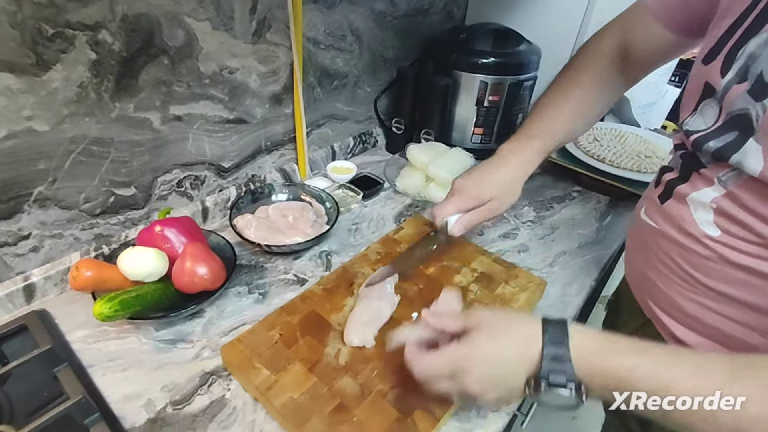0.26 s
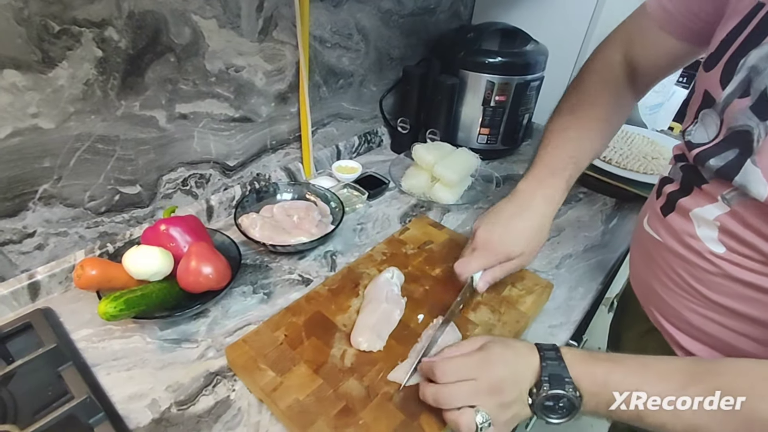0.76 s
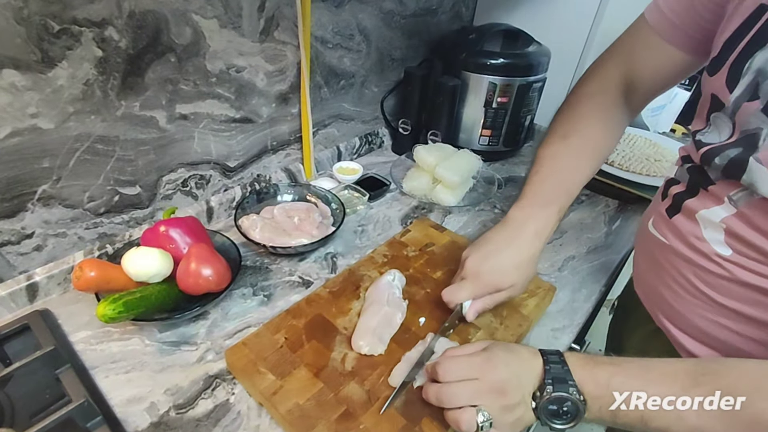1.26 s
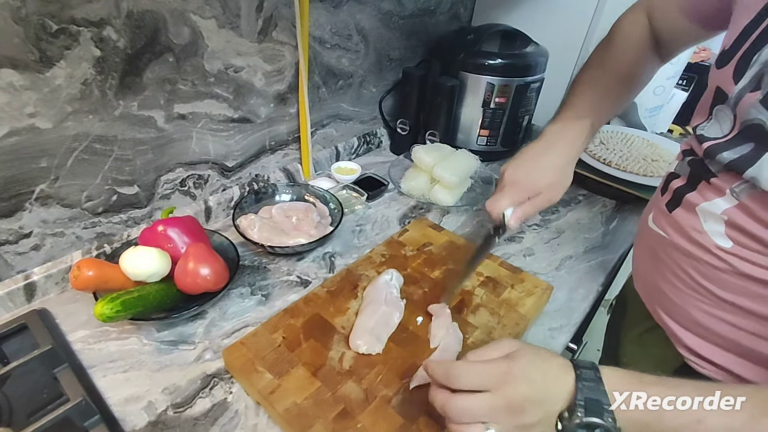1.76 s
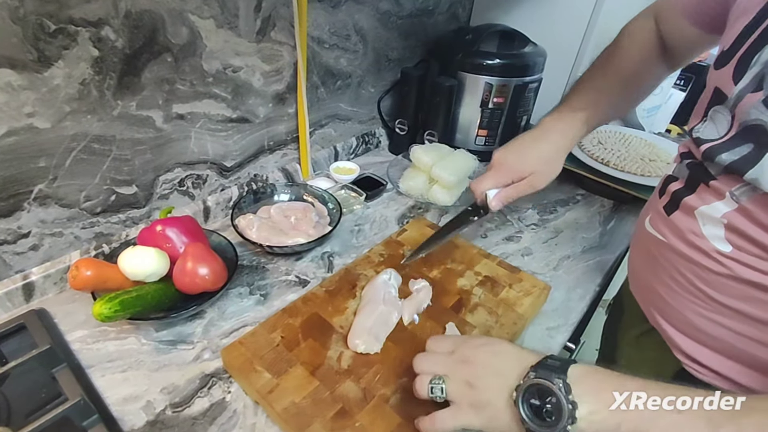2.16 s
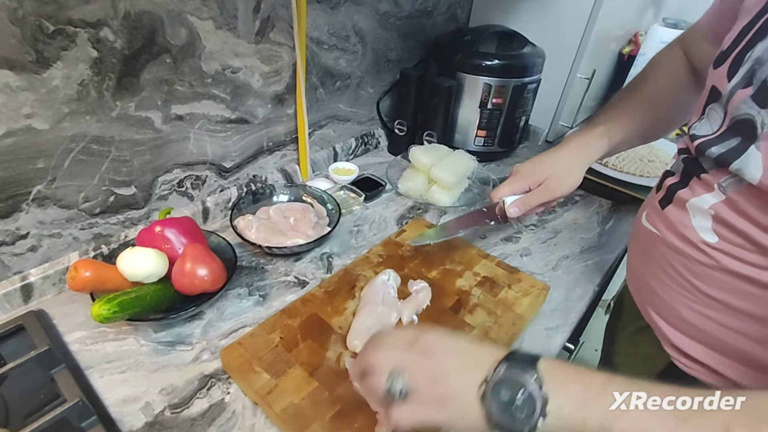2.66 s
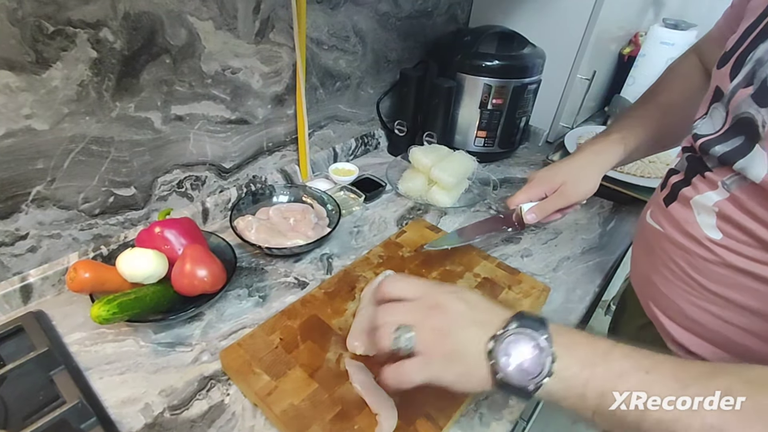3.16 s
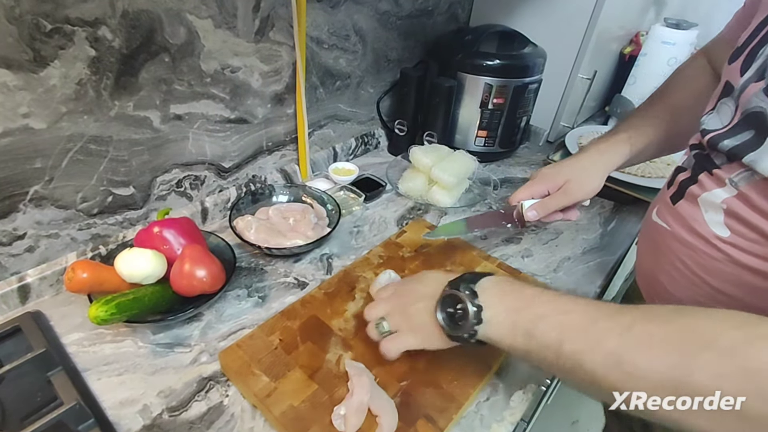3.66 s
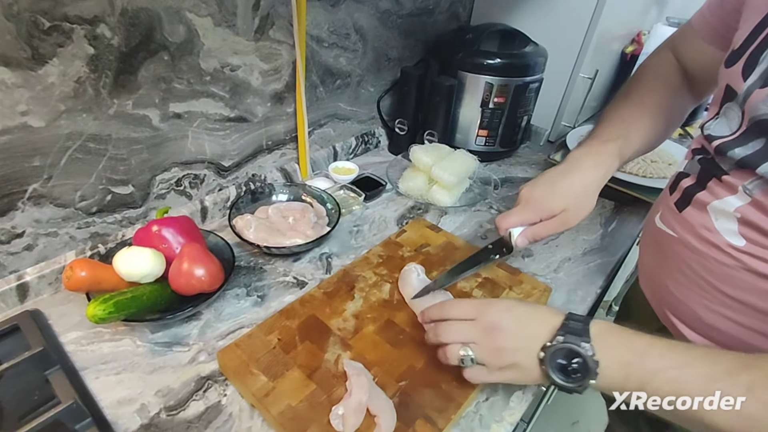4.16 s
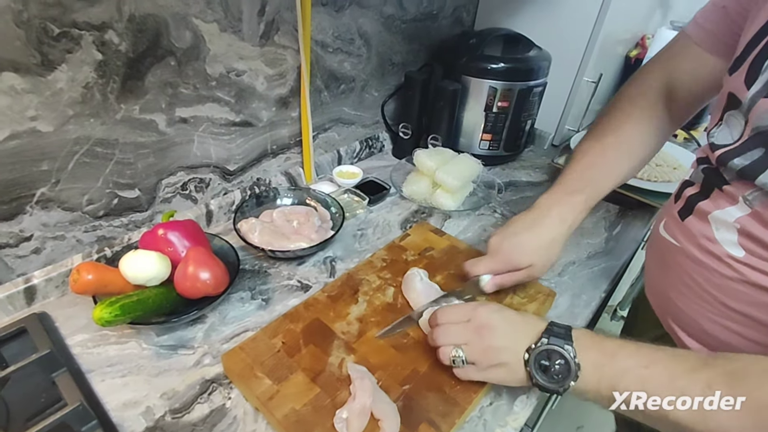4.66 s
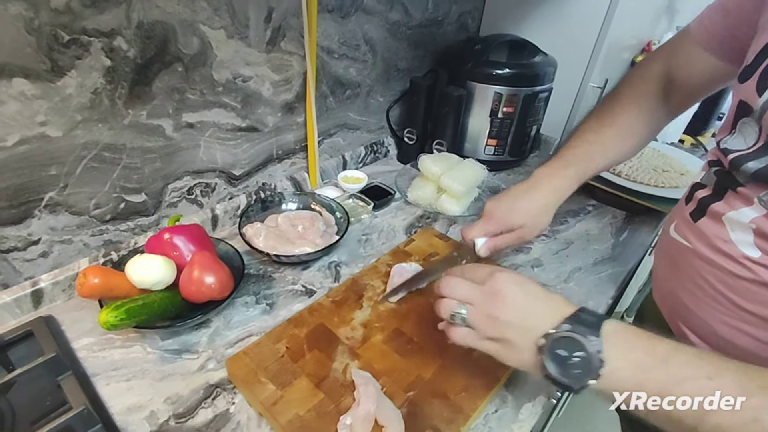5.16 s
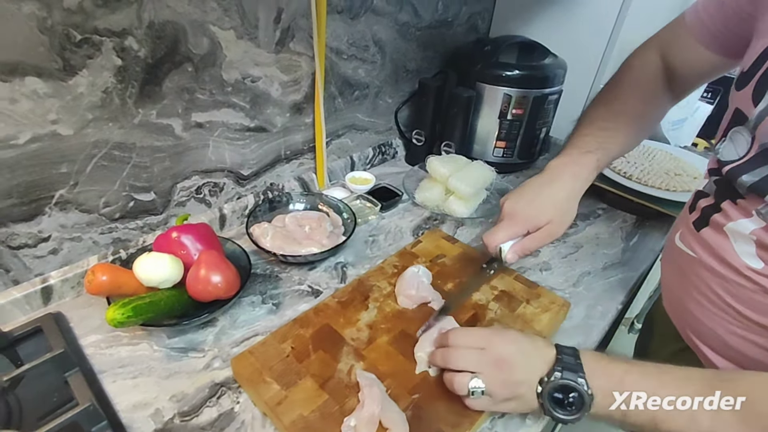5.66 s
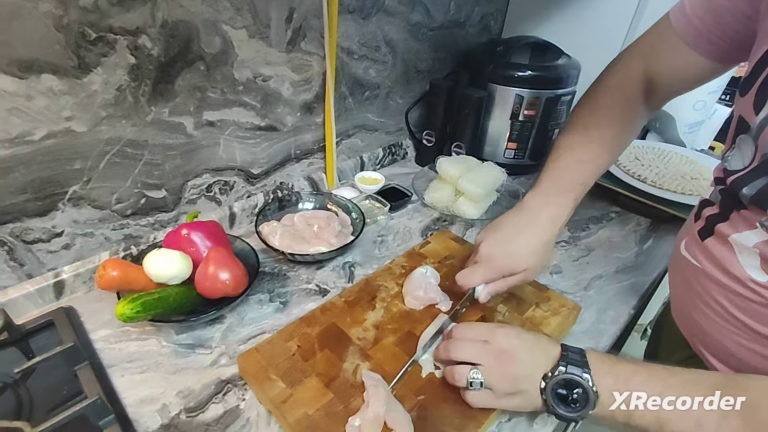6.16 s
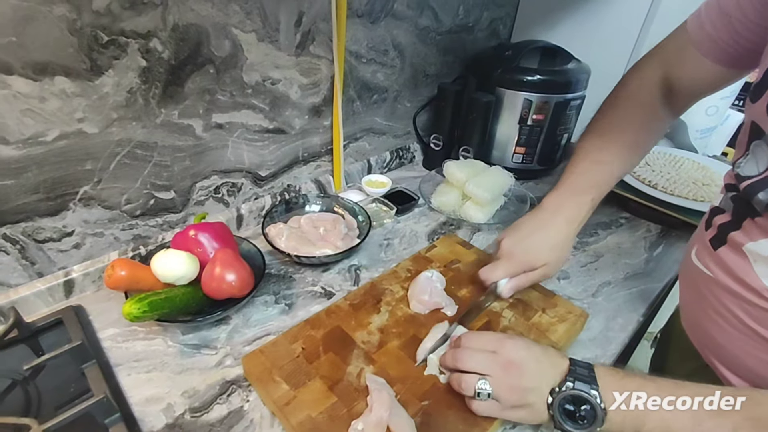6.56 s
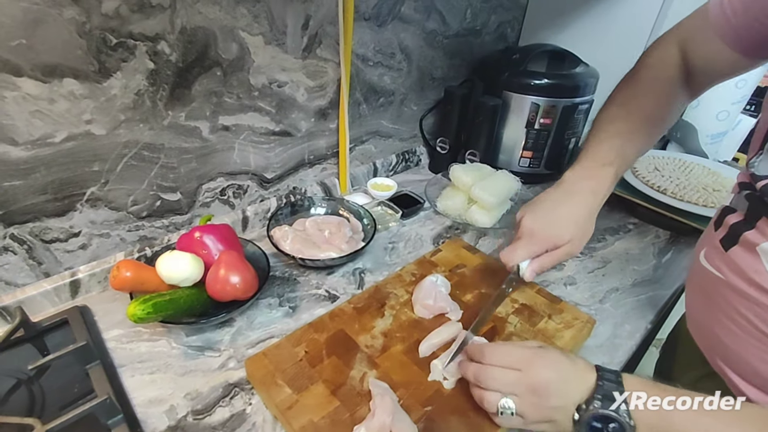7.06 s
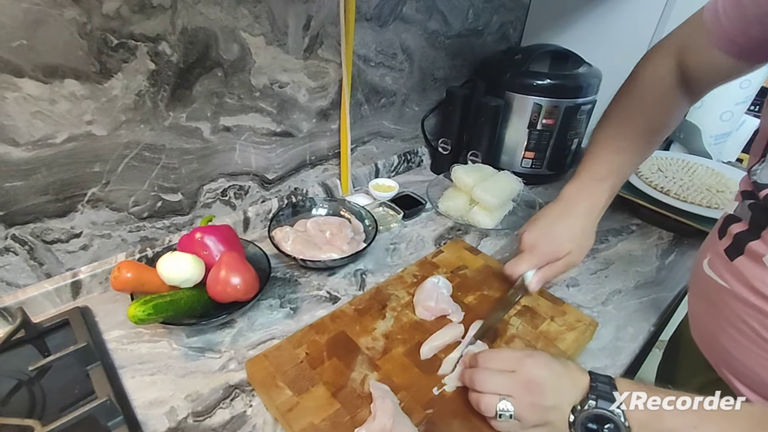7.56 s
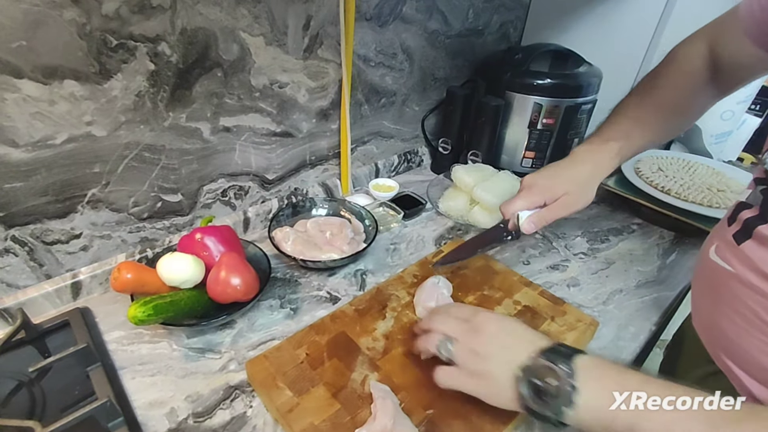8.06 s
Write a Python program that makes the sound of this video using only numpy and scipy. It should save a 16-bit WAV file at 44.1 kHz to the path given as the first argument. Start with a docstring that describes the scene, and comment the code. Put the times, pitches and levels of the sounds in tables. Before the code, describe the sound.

Wet meat squelches and slaps on a cutting board as a knife taps and saws through it in a small kitchen.

```python
"""A small, hard-walled kitchen: a knife slices raw chicken on a wooden board.
The edge taps down, then sticks and slips to and fro on the wood. Wet meat squelches under the
fingers, slices slap down, and the board bumps the counter. An appliance hums under a steady hiss.
Two microphone ports colour the treble differently."""
import sys
import numpy as np
from scipy import signal
from scipy.fft import rfft, irfft
from scipy.io import wavfile

SR = 44100
rng = np.random.default_rng(int(sys.argv[2]) if len(sys.argv) > 2 else 0)


def to_wav(s):
    """Save 16-bit WAV."""
    ch = np.atleast_2d(s).T  # columns
    pcm = np.round(np.clip(ch, -1, 1) * 32767)  # PCM
    wavfile.write(sys.argv[1], SR, pcm.astype(np.int16))


N = 366030


def gain_of(db):
    """Decibels to amplitude."""
    return 10 ** (np.asarray(db) / 20)


def unit_rms(x):
    """Scales to rms 1."""
    return x / np.sqrt(np.mean(x ** 2) + 1e-20)


def lookup(points, hz):
    """Interpolates a table on a log-frequency axis."""
    freq_hz, value = np.transpose(points)
    return np.interp(np.log(hz + 1), np.log(freq_hz + 1), value)


def tilt(hz, db_per_octave, pivot_hz):
    """Slope in dB about a pivot, flat in the bass."""
    return db_per_octave * np.log2(np.maximum(hz, 700) / pivot_hz)


def add(mix, start_s, sound):
    """Mixes a sound in at start_s."""
    part = mix[max(round(start_s * SR), 0):][:len(sound)]
    part += sound[:len(part)]


def coloured(x, gain_db, size=4096):
    """Minimum-phase filter; gain_db is a function of frequency."""
    hz = abs(np.fft.fftfreq(size, 1 / SR))
    log_gain = np.log(gain_of(np.maximum(gain_db(hz), -90)))
    impulse = np.fft.ifft(np.exp(np.conj(signal.hilbert(log_gain)))).real
    return signal.fftconvolve(x, impulse[:size // 2])[:len(x)]


def cut(x, order, cutoff_hz, kind="low"):
    """Low-pass or high-pass filter."""
    return signal.sosfilt(signal.butter(order, cutoff_hz, kind, fs=SR, output="sos"), x)


def resonate(x, hz, width_hz, stages=1):
    """Unity-gain resonators in series; hz may be a curve."""
    turn = np.exp(2j * np.pi * np.cumsum(hz * np.ones(len(x))) / SR)
    radius = np.exp(-np.pi * width_hz / SR)
    for _ in range(stages):
        x = 2 * (turn * signal.lfilter([1 - radius], [1, -radius], x / turn)).real
    return x


def ring(modes):
    """Decaying modes of alternating sign; each contact weights and tunes them slightly differently."""
    t = np.arange(SR // 4) / SR
    hz, level_db, t60_s = np.transpose(modes)[:, :, None]
    weight, detune = rng.standard_normal((2, len(modes), 1))
    decay = gain_of(level_db + 1.5 * weight - 60 * t / t60_s)
    waves = decay * np.sin(2 * np.pi * hz * (1 + .01 * detune) * t)
    return (-1) ** np.arange(len(modes)) @ waves


def clicks(samples, per_s, spread_db=3):
    """Random click train, many small and a few large."""
    size = gain_of(spread_db * np.minimum(rng.exponential(1, samples), 4))
    return unit_rms(size * rng.choice([-1, 1], samples) * (rng.random(samples) < per_s / SR))


def wander(t, per_s):
    """Random line of about unit size, per_s corners a second."""
    return np.interp(t * per_s, np.arange(len(t)), rng.standard_normal(len(t)))


# Diffuse field at the two ports: freq_hz, coherence
PORT_COHERENCE = [(40, 0.5), (120, 0.92), (300, 0.6), (650, 0.53), (1400, 0), (3000, 0)]
def diffuse(pair):
    """Makes two independent signals alike in the bass, as at two close ports."""
    a, b = rfft(pair)
    coherence = np.clip(lookup(PORT_COHERENCE, np.fft.rfftfreq(pair.shape[1], 1 / SR)), 0, 1)
    return irfft([coherence * a + np.sqrt(1 - coherence ** 2) * b, a], pair.shape[1])


# Room noise spectra: freq_hz, gain_db
RUMBLE_SPECTRUM = [(15, -20), (25, -10), (43, -2), (70, -2), (108, 5), (152, -4), (223, -7.5), (269, -6),
                   (346, -3.5), (485, -12.5), (738, -10.5), (1000, -2), (1270, -6), (1400, -85),
                   (1820, -55), (3080, -120)]
HISS_SPECTRUM = [(820, -48.5), (1400, -12.5), (1780, -8.5), (2000, -3), (2250, -3.5), (2500, 3.5),
                 (2730, -7.5), (3250, -9), (3550, -9), (3760, -13.5), (4150, -9.5), (6410, -26.5),
                 (10800, -22), (12800, -1.5), (14200, -11.5)]
# Appliance hum: pitch_hz, stage_half_width_hz, level_db
HUM_TONES = [(96.2, 5.6, -71), (123.8, 3.2, -64), (219.6, 3.7, -66.5), (368.3, 2.3, -67.5), (998, 31, -60),
             (2670, 126, -59.5)]
def background(rumble_db=-52.5, hiss_db=-42):
    """Low room noise, fine hiss and the wavering hum of an appliance."""
    def port():
        rumble, hiss, drive = rng.standard_normal((3, N))
        rumble = unit_rms(coloured(rumble, lambda f: lookup(RUMBLE_SPECTRUM, f)))
        hiss = unit_rms(coloured(hiss, lambda f: lookup(HISS_SPECTRUM, f)))
        hum = sum(gain_of(level_db) * unit_rms(resonate(drive, pitch_hz, 2 * half_width_hz, stages=2))
                  for pitch_hz, half_width_hz, level_db in HUM_TONES)
        return gain_of(rumble_db) * rumble + gain_of(hiss_db) * hiss + hum
    return diffuse(np.array([port(), port()]))


# Counter modes: pitch_hz, level_db, t60_s
COUNTER_MODES = [(99, -0.5, 0.12), (132, 5.5, 0.029), (179, -10.5, 0.18), (199, -3, 0.063),
                 (292.6, -5, 0.11), (392, -4, 0.08)]
# Board against counter: start_s, level_db, cutoff_hz
COUNTER_THUMPS = [(.329, -44, 700), (1.260, -36.5, 500), (1.272, -34.5, 300), (1.294, -50, 300),
                  (2.099, -49, 200), (2.628, -40, 500), (2.652, -40, 300), (3.545, -42, 89.5),
                  (3.933, -44.5, 130), (4.527, -46.5, 149), (6.453, -43, 400), (6.47, -44, 400),
                  (8.161, -46.5, 130)]
def counter_thumps(gain_db=3.5):
    """A push through the board bumps the counter; a softer hand gives a lower cutoff."""
    out = np.zeros(N)
    for start_s, level_db, cutoff_hz in COUNTER_THUMPS:
        boom = cut(ring(COUNTER_MODES), 2, cutoff_hz)
        add(out, start_s, gain_of(level_db + gain_db) * boom / abs(boom).max())
    return out


# Bursting juice: freq_hz, gain_db
JUICE_SPECTRUM = [(1200, -24), (1550, -10.5), (2050, -1), (2500, -2), (3500, 2), (4400, -4), (6900, -22.5),
                  (7800, -16), (9700, -21), (11800, -5), (13300, -13.5), (14400, -32)]
# Meat pressed or peeled: start_s, length_s, rise_s, level_db, pocket_hz, tilt_db_per_octave
MEAT_SQUELCHES = [ (0.773, 0.043, .012, -47.5, 3400, -2), (1.645, 0.05, 0.026, -41.5, 3880, 0),
                  (1.859, 0.061, 0.031, -40, 3520, 0.5), (2.067, 0.085, 0.018, -39, 3570, 0.5),
                  (2.319, 0.083, 0.0069, -36.5, 3460, 0.5), (2.568, 0.032, .008, -37, 3580, 1),
                  (2.75, 0.019, 0.011, -34.5, 3580, -2), (2.862, 0.042, 0.0093, -39.5, 3300, 0.5),
                  (2.956, 0.05, 0.014, -40.5, 3600, 1), (3.195, 0.032, 0.016, -44, 3100, -1),
                  (3.345, .045, 0.015, -46.5, 4030, 1), (3.394, 0.025, 0.017, -38.5, 3430, -0.5),
                  (3.593, 0.033, 0.01, -42.5, 3260, -0.5), (3.704, .05, 0.0084, -42.5, 4200, -2.5),
                  (3.775, 0.034, 0.016, -45.5, 3420, 1), (3.931, .055, 0.016, -44, 3420, -0.5),
                  (4.16, 0.034, 0.017, -44, 3560, -1), (4.329, 0.051, 0.012, -44, 3470, 0.5),
                  (4.472, 0.067, 0.026, -41, 3180, -2.5), (5.243, 0.045, 0.025, -39, 3630, 0.5),
                  (5.5, 0.02, .008, -38, 3600, 2), (7.276, 0.069, .035, -48.5, 3500, 16), ]
def meat_squelches(pops_per_s=1500, release_s=0.0086, pocket_octaves=0.083, pocket_db=-7, gain_db=-.5):
    """Tiny films of juice burst and ring air pockets of changing size."""
    out = np.zeros(N)
    for start_s, length_s, rise_s, level_db, pocket_hz, db_per_octave in MEAT_SQUELCHES:
        t = np.arange(0, length_s + 5 * release_s, 1 / SR)
        squeeze = np.minimum(t / rise_s, 1) * np.exp(-np.maximum(t - length_s, 0) / release_s)
        pops = unit_rms(coloured(clicks(len(t), pops_per_s),
                                 lambda f: lookup(JUICE_SPECTRUM, f) + tilt(f, db_per_octave, pocket_hz)))
        pitch_hz = pocket_hz * 2 ** (pocket_octaves * wander(t, per_s=82))
        pockets = unit_rms(resonate(pops, pitch_hz, width_hz=450))
        crackle = unit_rms(pops + gain_of(pocket_db) * pockets)
        add(out, start_s, gain_of(level_db + gain_db) * squeeze * crackle)
    return out


# Board modes, low bending and higher, shared with the knife: pitch_hz, level_db, t60_s
BENDING_MODES = [(822.6, -9.5, 0.076), (1003, -6.5, 0.022), (1113, -1, 0.032)]
BOARD_MODES = [(1468, -10.5, 0.15), (1642, 1.5, 0.035), (1728, 2.5, 0.027), (1894, -3.5, 0.064),
               (2150, -10, 0.056), (2526, -9, 0.085), (2680, -14, 0.03)]
# Wet smack: freq_hz, gain_db
SMACK_SPECTRUM = [(550, -32.5), (800, -30), (1020, -14), (1350, -16), (1820, 2.5), (2280, 3), (2800, -7),
                  (3700, -3), (6500, -31.5), (7800, -27.5), (9600, -30.5), (11700, -15), (13200, -14.5),
                  (14500, -38)]
# Meat lands or lets go: start_s, level_db, decay_s, tilt_db_per_octave
MEAT_SLAPS = [(.047, -22, 0.019, 4.5), (0.3275, -3.5, 0.0021, 2.5), (0.3343, -14, 0.0013, 7),
              (0.3392, -7.5, 0.0025, 18), (2.134, -44, 0.0036, 14), (2.329, -25, .008, 9),
              (2.574, -29.5, 0.0077, 3), (2.6253, -9, 0.0029, -2), (2.6280, 0, 0.0029, 1.5),
              (2.653, -29, 0.0013, 7), (2.677, -17, 0.008, 3), (3.724, -35, 0.012, 3),
              (3.930, -16.5, 0.0037, 2.5), (4.110, -23.5, 0.0047, 1.5), (5.286, -21.5, 0.0012, 2),
              (5.5057, -31, 0.0048, 7), (6.733, -24.5, 0.007, 0.5)]
def meat_slaps(pivot_hz=2500, wood_db=-12, bending_db=-18, gain_db=-7):
    """A wet face lands in a short burst of splashes; the board rings under it."""
    out, t = np.zeros(N), np.arange(SR // 4) / SR
    for start_s, level_db, decay_s, db_per_octave in MEAT_SLAPS:
        burst = rng.choice([-1, 1], len(t)) * np.exp(-t / decay_s)
        smack = coloured(burst, lambda f: lookup(SMACK_SPECTRUM, f) + tilt(f, db_per_octave, pivot_hz))
        wood = gain_of(wood_db) * unit_rms(ring(BOARD_MODES))
        wood += gain_of(bending_db) * unit_rms(ring(BENDING_MODES))
        weight = gain_of(-2 * db_per_octave)  # light, bright smacks hardly move the wood
        add(out, start_s, gain_of(level_db + gain_db) * (unit_rms(smack) + weight * wood) * burst.std())
    return out


# Blade meets wood: start_s, level_db, centre_hz, octave_drop_db
KNIFE_TAPS = [(.053, -22.5, 1700, 15), (0.8625, -17.5, 1550, 26), (1.056, -23, 1900, 32),
              (1.640, -28, 1400, 17), (2.953, -27, 1990, 70), (2.962, -28, 1820, 70),
              (3.326, -37, 1900, 72), (3.627, -23.5, 1750, 5), (3.642, -34, 1140, 11),
              (3.93, -36, 1020, 15), (4.108, -29.5, 1900, 80.5), (4.808, -34, 1950, 49),
              (6.1, -18.5, 1440, 19), (6.38, -27.5, 1710, 29), (6.7325, -22.5, 1900, 6.5),
              (7.352, -35, 1090, 16), (7.363, -28, 1740, 25), (7.844, -34.5, 1830, 19),
              (8.162, -31, 1750, 10)]
def knife_taps(wood_db=-11, bounces=4, bounce_s=0.001403, bounce_db=-3):
    """The edge settles in quick dead knocks; it stays down, so the board rings little."""
    out = np.zeros(N)
    for start_s, level_db, centre_hz, octave_drop_db in KNIFE_TAPS:
        wood = ring(BENDING_MODES + BOARD_MODES)
        add(out, start_s, gain_of(level_db + wood_db) * wood / abs(wood).max())
        impulse = signal.unit_impulse(len(wood))
        knock = coloured(impulse, lambda f: -octave_drop_db * np.log2((f + 1) / centre_hz) ** 2)
        knock /= abs(knock).max()
        for k, late in enumerate(rng.random(bounces)):
            add(out, start_s + (k + .5 * late) * bounce_s, gain_of(level_db + k * bounce_db) * knock)
    return out


# Edge on wood: freq_hz, gain_db
SCRAPE_SPECTRUM = [(700, -42), (1280, -21), (1450, -5), (1900, -3.5), (2400, 2.5), (2750, -3.5),
                   (3600, 1.5), (4400, -9), (7000, -27.5), (8000, -20), (10000, -25), (12000, -7.5),
                   (13300, -10), (14400, -31)]
# One push or pull: start_s, length_s, level_db, fastest_fraction, hiss_db, groan_db,
# hardest_fraction, groan_hz, rasp_db, rasp_start_hz, rasp_end_hz
KNIFE_STROKES = [ (0.0, 0.061, -34, 0.1, -7, -18, 0.36, 1050, 2, 2370, 2190),
                 (0.044, 0.04, -30.5, 0.29, -3, -10.5, 0.65, 926, -1, 2180, 2090),
                 (0.866, 0.092, -33, 0.34, -10.5, -13, .65, 1110, 6, 1880, 1790),
                 (0.989, 0.15, -33, 0.3, -4.5, -13, 0.53, 1100, 8, 1750, 2140),
                 (1.159, .16, -32, 0.44, -10.5, -12, 0.77, 990, 4.5, 2110, 2000),
                 (1.332, 0.24, -30.5, 0.41, -5.5, -15, 0.15, 1120, 5.5, 2030, 1890),
                 (1.533, 0.14, -34, 0.71, -5.5, -11.5, 0.59, 990, 9, 1830, 1950),
                 (4.618, 0.18, -30.5, 0.75, -9.5, -14.5, 0.28, 1090, 3, 2140, 2500),
                 (4.749, 0.13, -28.5, 0.49, -9.5, -22.5, 0.23, 895, 12.5, 1915, 1860),
                 (4.895, .14, -39, .35, -0.5, -9, 0.65, 835, 2, 1870, 1880),
                 (4.991, 0.11, -32.5, 0.54, -3, -11, 0.24, 835, -4, 1740, 2130),
                 (6.099, .07, -37, 0.15, -12, -13, .2, 1130, 10, 2030, 1730),
                 (6.197, 0.097, -37, 0.58, -8.5, -16, 0.66, 1080, 2, 2130, 2130),
                 (6.282, 0.051, -36, 0.37, -12.5, -27, .5, 1080, 5, 1520, 1440),
                 (6.375, 0.13, -30.5, 0.46, -12.5, -8.5, 0.91, 960, -7, 1500, 2010),
                 (6.523, 0.17, -31.5, 0.46, -6.5, -12.5, 0.18, 915, -5, 1480, 1570),
                 (7.346, 0.064, -32.5, 0.39, -13.5, -23, .15, 1000, 1, 1790, 2120),
                 (7.443, 0.13, -29.5, 0.58, -8, -21, 0.3, 1100, -3.5, 1580, 1380),
                 (7.55, 0.11, -33.5, 0.15, -4, -21, 0.34, 1090, -1, 2310, 1950), ]
def knife_scrapes(slips_per_s=3500, split_hz=2800, press_s=0.052, light_press_db=-9.5,
                  drag_db=1.44, drag_per_s=58.6, waver_octaves=0.073, hiss_growth_db=8.5):
    """Stick-slip on wood: a rasp that moves with the contact point, fine hiss, a groan under pressure."""
    out = np.zeros(N)
    for (start_s, length_s, level_db, fastest_fraction, hiss_db, groan_db,
         hardest_fraction, groan_hz, rasp_db, rasp_start_hz, rasp_end_hz) in KNIFE_STROKES:
        t = np.arange(0, length_s, 1 / SR)
        progress = t / length_s
        speed = np.sin(np.interp(progress, [0, fastest_fraction, 1], [0, np.pi / 2, np.pi]))
        press = np.exp(-((t - hardest_fraction * length_s) / press_s) ** 2)
        press = np.maximum(press, gain_of(light_press_db))
        drag, waver = wander(t, drag_per_s), wander(t, drag_per_s)
        rasp_hz = np.interp(progress, [0, 1], [rasp_start_hz, rasp_end_hz]) * 2 ** (waver_octaves * waver)

        slips, fine_slips, catches = (clicks(len(t), slips_per_s) for _ in range(3))
        dull = unit_rms(cut(coloured(slips, lambda f: lookup(SCRAPE_SPECTRUM, f)), 6, split_hz))
        hiss = coloured(fine_slips, lambda f: lookup(SCRAPE_SPECTRUM, f))
        hiss = unit_rms(cut(hiss, 6, split_hz, "high"))
        rasp = unit_rms(resonate(catches, rasp_hz, width_hz=280, stages=2))
        wood = unit_rms(signal.fftconvolve(catches, ring(BOARD_MODES))[:len(t)])
        bending = signal.fftconvolve(catches, ring(BENDING_MODES))[:len(t)]
        groan = unit_rms(resonate(bending, groan_hz, width_hz=160))  # the contact favours one mode
        body = unit_rms(dull + gain_of(rasp_db) * rasp + gain_of(-2) * wood)

        sink_db = hiss_growth_db * (progress - .5)  # the edge sinks through the meat
        stroke = (gain_of(-1) * body * speed ** 0.56
                  + gain_of(hiss_db + sink_db) * hiss * speed ** 1.1
                  + gain_of(groan_db - 2) * groan * press * np.sqrt(speed))
        add(out, start_s, gain_of(level_db + drag_db * drag) * stroke)
    return out


# Reverberation: freq_hz, t60_s
KITCHEN_DECAY = [(150, 0.51), (1000, 0.23), (2500, 0.24), (6000, 0.3), (14000, 0.18)]
def kitchen(x, wet_db, echoes_per_s=3000, first_echo_s=0.00054):
    """Direct sound, slightly earlier at the left port, then dense echoes from counter and walls."""
    shape = (2, SR // 2)
    echoes = rng.choice([-1., 1.], shape) * (rng.random(shape) < echoes_per_s / SR)
    hz, t, spectra = signal.stft(diffuse(echoes), SR, nperseg=256)
    decay = gain_of(-60 * t / lookup(KITCHEN_DECAY, hz)[:, None])
    tail = signal.istft(spectra * decay, SR, nperseg=256)[1]
    tail *= np.arange(tail.shape[1]) > first_echo_s * SR
    tail /= np.linalg.norm(tail, axis=1, keepdims=True)
    direct = np.array([x, np.roll(x, 4)])
    return direct + gain_of(wet_db) * signal.fftconvolve(x[None], tail, axes=1)[:, :N]


def scene():
    """Knife, meat and board in the kitchen, over the background."""
    return (kitchen(knife_scrapes(), wet_db=-1.5)
            + kitchen(meat_squelches(), wet_db=3.5)
            + kitchen(knife_taps(), wet_db=-3.5, first_echo_s=0.0042)
            + kitchen(meat_slaps(), wet_db=1.5)
            + kitchen(counter_thumps(), wet_db=-6.5)
            + background())


# Port balance: freq_hz, left_over_right_db
PORT_BALANCE = [(700, 0), (1500, -3), (2000, -11.5), (3500, -13), (4300, -7), (6000, -17), (7200, 3),
                (8200, 42), (9600, -21), (11000, -5), (13000, -12.5)]
def record(dry, cutoff_hz=14450):
    """Treble peaks and notches for each port, soft clipping, then a low-pass."""
    ratio = gain_of(lookup(PORT_BALANCE, np.fft.rfftfreq(N, 1 / SR)))
    port_gains = np.array([ratio, np.ones_like(ratio)]) * np.sqrt(2 / (1 + ratio ** 2))
    clipped = np.tanh(irfft(rfft(dry) * port_gains, N))
    lowpass = signal.firwin(511, cutoff_hz, window=("kaiser", 9), fs=SR)
    return signal.oaconvolve(clipped, lowpass[None], "same")


dry = scene()
out = record(dry)
to_wav(out)
```